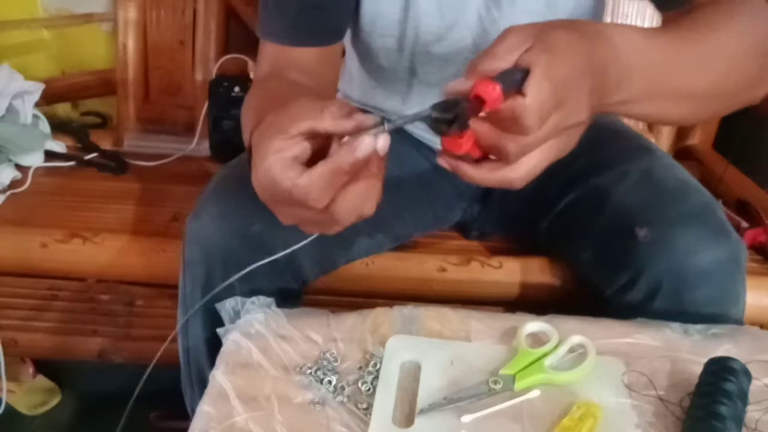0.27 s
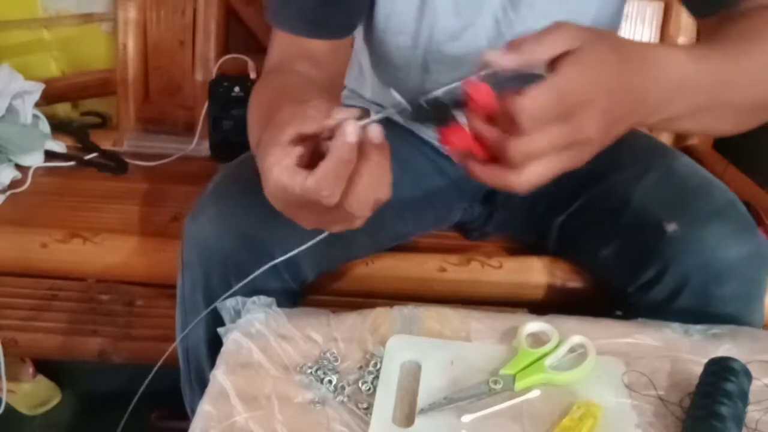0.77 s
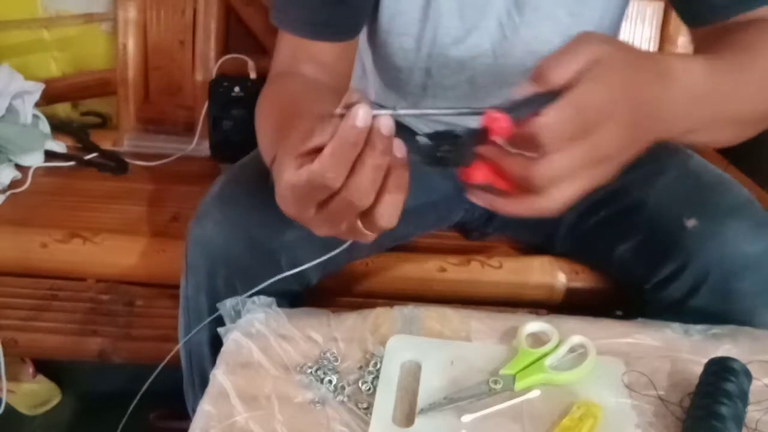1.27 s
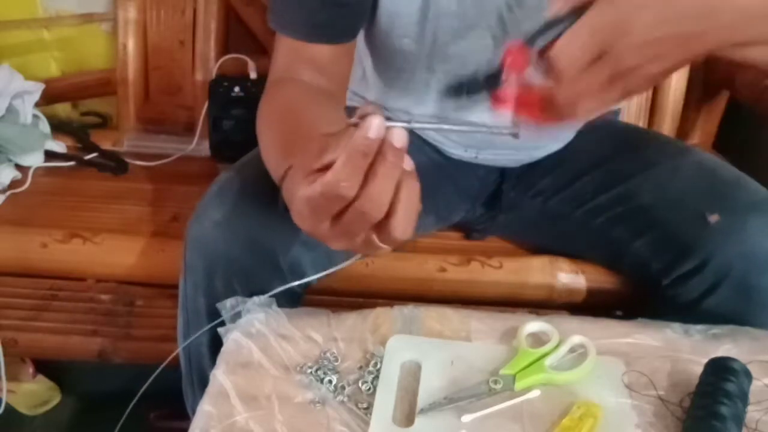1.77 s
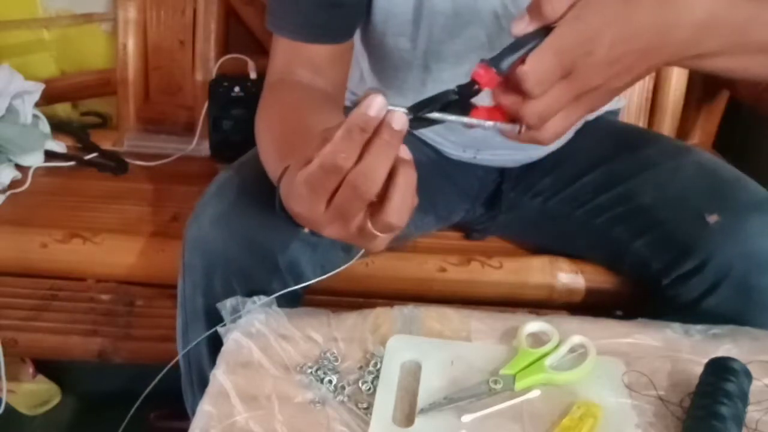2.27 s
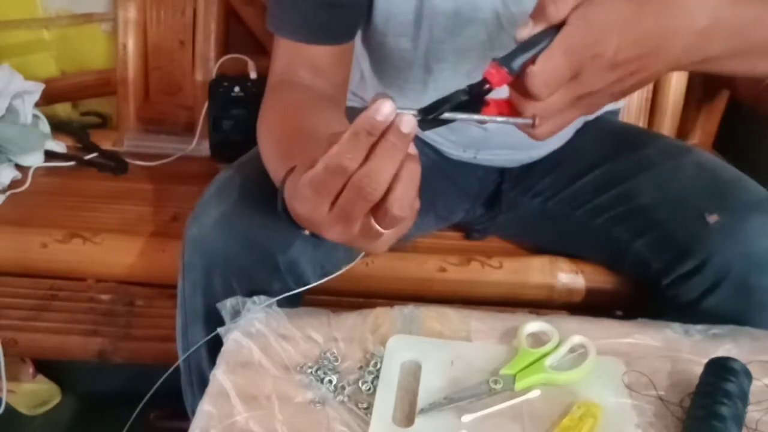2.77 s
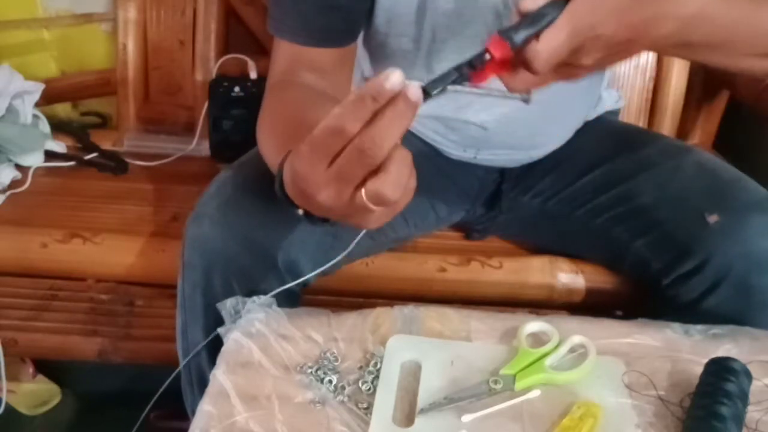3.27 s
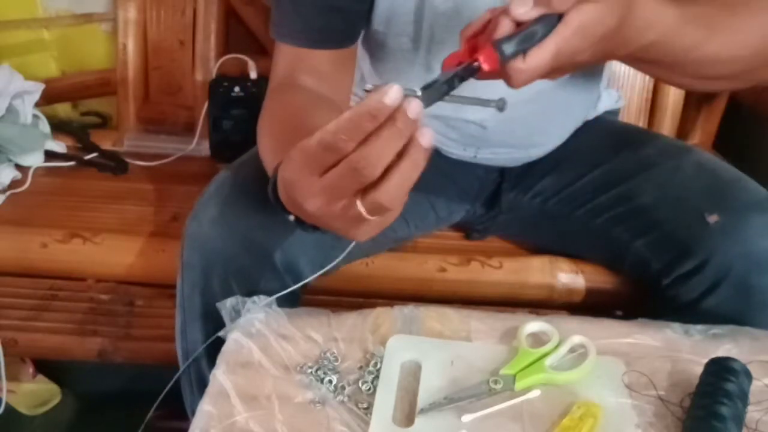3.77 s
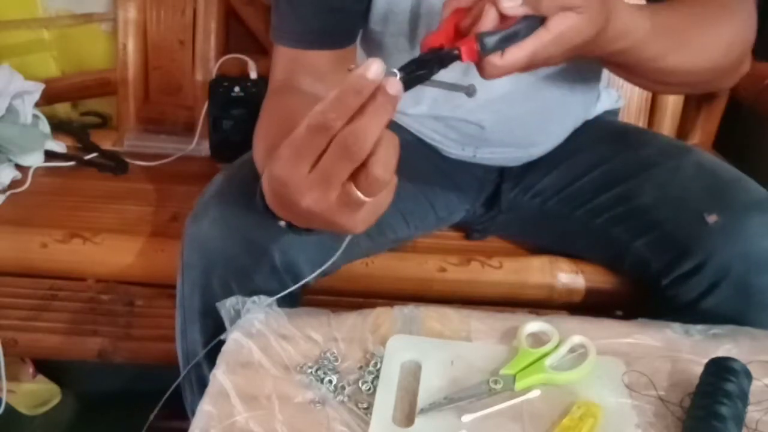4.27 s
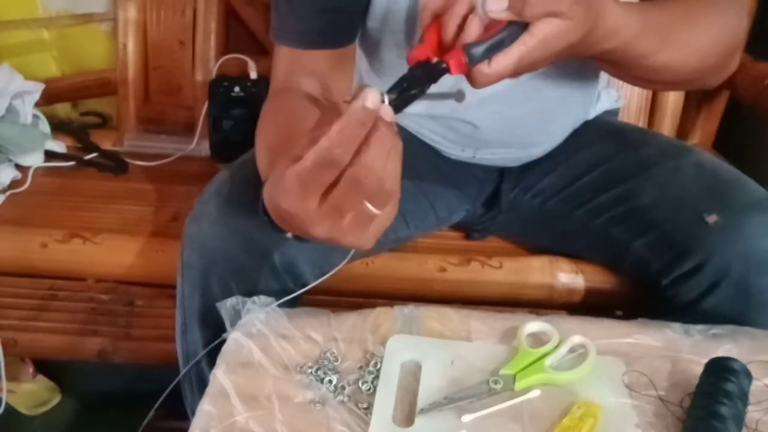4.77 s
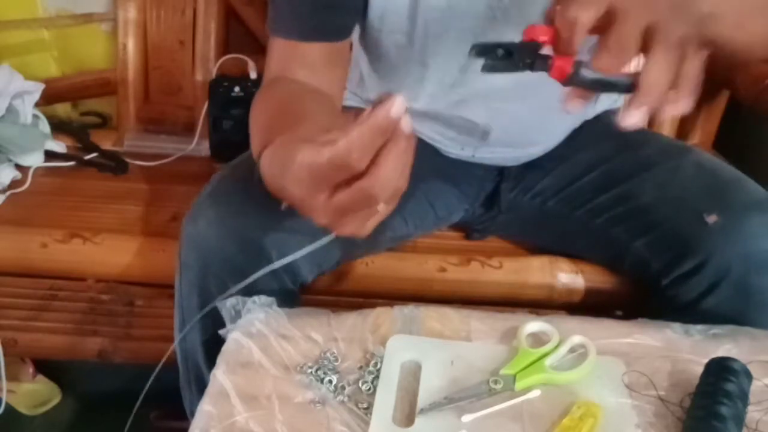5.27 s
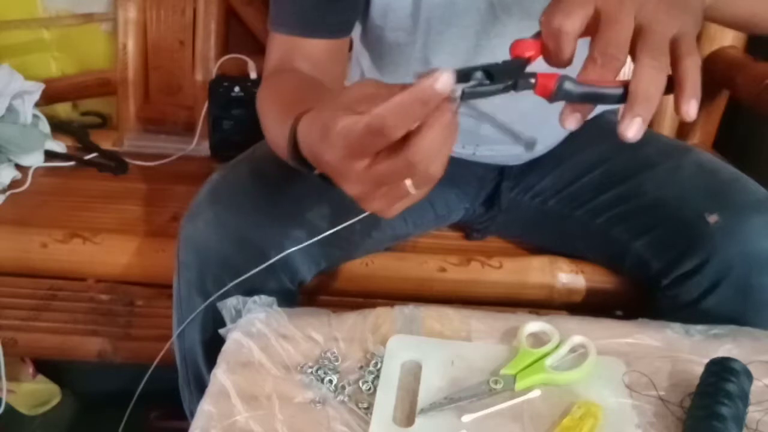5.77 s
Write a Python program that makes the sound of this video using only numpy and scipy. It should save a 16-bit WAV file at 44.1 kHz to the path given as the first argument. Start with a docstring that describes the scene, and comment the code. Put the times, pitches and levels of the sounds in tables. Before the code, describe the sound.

Distant hammer blows on wood, about two a second, sound behind close metallic plier clicks, tiny wire ticks and constant hiss.

```python
"""In a half-open wooden workroom, pliers work steel wire round a nail close to a small microphone.
Jaws snap, scrape and tick: short noise bursts, with ringing steel in the snaps and scrapes.
Further off a hammer hits wood, mostly about twice a second: ringing modes and noise echoes.
Something hollow is bumped once: a note, a low thud and echoes. Steady filtered noise hisses below."""
import sys
import numpy as np
from scipy import signal
from scipy.fft import rfft, irfft
from scipy.io import wavfile
from scipy.ndimage import uniform_filter1d

SR = 44100
rng = np.random.default_rng(int(sys.argv[2]) if len(sys.argv) > 2 else 0)


def output_pcm(signal):
    """Save a mono or channel-first signal as 16-bit PCM at the path in sys.argv[1].

    Samples are clipped to [-1, 1] before scaling.
    """
    pcm = np.clip(np.atleast_2d(signal).T, -1, 1) * 32767
    wavfile.write(sys.argv[1], SR, np.round(pcm).astype(np.int16))


N = 264644  # length of the scene in samples, about 6 s

# hammer blows: (time [s], strength [dB], brightness [dB per octave], extra sizzle [dB])
BLOWS = [(.351, -7.5, 0, -14), (1.29, -5, -0.4, -2.5), (1.826, -.3, 1.5, -9), (2.299, -4.5, 2.5, -14),
         (2.763, -1, 1.1, -13), (3.2272, -7, 0.5, 3), (3.6505, -5.5, -0.3, -10), (4.103, -4.5, 0.5, -8)]
# how slowly sound builds up, before each source stretches it: (pitch [Hz], build-up time [s])
SWELL = [(100, 0.0096), (400, 0.0045), (900, 0.00093), (1500, 0.0019), (5000, 0.012)]


def amp(db):
    """Turns decibels into a factor that multiplies the wave."""
    return 10 ** (np.asarray(db) / 20)


def read(points, hz):
    """Reads a table at any pitch, with straight lines between its points over log frequency."""
    f, value = np.transpose(points)
    return np.interp(np.log(hz + 1), np.log(f + 1), value)


def add(mix, s, sound):
    """Lays a sound into the mix at time s [s]; what runs past the end is cut off."""
    part = mix[round(s * SR):][:len(sound)]
    part += sound[:len(part)]


def colour(x, db_at, size=8192):
    """Filters with a gain of db_at(Hz) [dB]; each sound is answered only after it arrives."""
    log_gain = np.log(amp(db_at(abs(np.fft.fftfreq(size, 1 / SR)))))
    # the Hilbert transform finds the phase that puts the response as early as possible
    taps = np.fft.ifft(np.exp(np.conj(signal.hilbert(log_gain)))).real
    return signal.fftconvolve(x, taps[:size // 2])[:len(x)]


def within(x, low_hz, high_hz, order=8):
    """Keeps a range of pitches, with a steep lower edge and a gentler upper one."""
    low, high = np.minimum([low_hz, high_hz], SR / 2 - 1)
    high_pass = signal.butter(order, low, "high", fs=SR, output="sos")
    low_pass = signal.butter(order // 2, high, fs=SR, output="sos")
    return signal.sosfilt(low_pass, signal.sosfilt(high_pass, x))


def mode(hz, db, rise, t60):
    """One resonance builds up over rise [s] and dies away, falling 60 dB in t60 [s]."""
    t = np.arange(SR // 2) / SR
    envelope = (1 - np.exp(-t / rise)) * np.exp(-np.log(1000) * t / t60)
    return amp(db) * envelope * np.sin(2 * np.pi * (hz * t + rng.random()))


def echoes(swell=0.95, linger=1., bands=9):
    """Half a second of dense reflections, each band of noise building up and dying at its own pace."""
    # how long the room rings, before linger stretches it: (pitch [Hz], time to fall 60 dB [s])
    room_ring = [(100, 0.19), (500, 0.51), (1200, 0.33), (3500, 0.52), (8000, 0.15), (15000, 0.32)]
    t = np.arange(SR // 2) / SR
    spectrum = rfft(rng.standard_normal(len(t)))
    hz = np.fft.rfftfreq(len(t), 1 / SR)
    centres = np.geomspace(60, 15000, bands)
    out = np.zeros(len(t))
    # each row of shares picks one band, which fades into its neighbours
    for centre, share in zip(centres, np.eye(bands)):
        band = irfft(spectrum * read(np.c_[centres, share], hz), len(t))
        build_up = 1 - np.exp(-t / (swell * read(SWELL, centre)))
        decay = np.exp(-np.log(1000) * t / (linger * read(room_ring, centre)))
        out += band * build_up * decay
    return out


def burst(length, passes=6):
    """A dying noise crack of unit energy, its pitches evened out; length [s] sets how fast it fades."""
    t = np.arange(SR // 2) / SR
    fade = np.exp(-t / length)
    crack = rng.standard_normal(len(t)) * fade
    for _ in range(passes):
        # make all pitches equally strong, then fade a little again
        even = irfft(np.exp(1j * np.angle(rfft(crack))), len(t))
        crack = even * fade ** (1 / passes)
    return crack / np.linalg.norm(crack)


def scratch(length, wet_db=-0.5, swell=0.53, linger=0.84):
    """A burst of friction and its answer from the room."""
    room = echoes(swell, linger)
    return burst(length) + amp(wet_db) * room / np.linalg.norm(room)


def reflect(x, echo_db, latest=.006, count=6):
    """Nearby boards return short echoes, which leave fine fixed ripples in the spectrum."""
    echo = np.zeros(len(x))
    for k, u in enumerate(rng.random(count)):
        delay = int((.2 + .8 * u) * latest * SR)
        echo += np.roll(x, delay) * (-1) ** k  # every other echo is upside down
    return (x + amp(echo_db) * echo / np.sqrt(count)) / np.hypot(1, amp(echo_db))


def mottle(x, frames=5, bins=11):
    """Lets the level drift in small patches of time and pitch."""
    # typical drift of a patch, before overlapping frames blend: (pitch [Hz], drift [dB])
    drift_size = [(100, 1.5), (300, 2), (800, 4), (1250, 0.4), (2000, 2), (4000, 1.5), (9000, 1),
                  (13000, 3)]
    hz, _, z = signal.stft(x, SR, nperseg=1024, noverlap=768)
    patches = uniform_filter1d(rng.standard_normal(z.shape), bins, axis=0)
    patches = uniform_filter1d(patches, frames, axis=1)
    drift_db = read(drift_size, hz)[:, None] * patches / patches.std()
    return signal.istft(z * amp(drift_db), nperseg=1024, noverlap=768)[1][:len(x)]


def background():
    """Mottled hiss, made of noise, with the room's standing waves and two faint tones from afar."""
    # colour of the steady hiss: (pitch [Hz], level [dB])
    hiss = [(20, -66), (45, -45), (85, -34), (130, -35), (200, -37), (400, -43.5), (750, -42), (1000, -35),
            (2000, -35.5), (6000, -38), (16000, -41.5)]
    # standing waves that lift the hiss: (pitch [Hz], width [Hz], boost [dB])
    standing_waves = [(233, 12, 6.5), (290.3, 5, 9.5), (445, 32.5, 12.5), (523, 24, 8.5), (624.7, 16, 10),
                      (967, 24, 6.5), (1248, 55, 2.5)]
    # faint distant tones: (time [s], pitch [Hz], level [dB], length [s])
    far_tones = [(5.68, 520, -48, 0.14), (5.757, 1235, -48, 0.11)]

    def hiss_db(hz):
        peaks = sum(db / (1 + (2 * (hz - f) / width) ** 2) for f, width, db in standing_waves)
        return read(hiss, hz) + peaks

    air = colour(rng.standard_normal(N), hiss_db)
    air = mottle(reflect(air, echo_db=-11))
    for s, hz, db, length in far_tones:
        t = np.arange(int(length * SR)) / SR
        swell_and_fade = np.sin(np.pi * t / length)
        add(air, s, amp(db) * swell_and_fade * np.sin(2 * np.pi * hz * t))
    return air


def wire_ticks(count=70, loudest_db=-8, spread_db=4, centre_hz=7800, length=0.007):
    """Tiny noise ticks as the wire creeps between fingers and nail, each at its own pitch."""
    out = np.zeros(N)
    for when, softness, pitch in rng.random((count, 3)):
        hz = centre_hz * 2 ** (pitch - .5)  # up to half an octave either way
        tick = within(burst(length), hz / 1.1, hz * 1.1)
        add(out, when * N / SR, amp(loudest_db - spread_db * softness) * tick)
    return out


def hammer(ring_t60=0.32, dense_db=-1, linger=0.97, swell=1.8, lag=.002, fresh=0.82,
           spot_db=2.0, knock_hz=880, knock_db=-28):
    """A soft direct knock leads ringing wood and louder echoes, partly shared and partly new each time."""
    # the struck wood and the room round it, before the spot shifts them: (pitch [Hz], level [dB])
    wood_modes = [(168, -32), (234, -31), (281, -35.5), (414, -36), (458, -37), (623, -85), (763, -45),
                  (827, -29), (869, -34), (908, -43), (968, -47), (1047, -38), (1201, -42.5), (1236, -35.5),
                  (1296, -43), (1405, -40), (1518, -41), (1640, -39), (1785, -32.5)]
    # colour of the dense echoes, before dense_db and the blow's strength: (pitch [Hz], level [dB])
    blow_colour = [(40, -34), (100, -8), (220, -10), (400, -15), (850, -11.5), (1300, -15), (2100, -15.5),
                   (3200, -22.5), (4500, -28.5), (7000, -27), (15000, -40)]
    rings = np.array([mode(hz, db, swell * read(SWELL, hz), ring_t60) for hz, db in wood_modes])
    path = echoes(swell, linger)  # the part of the echoes that every blow shares
    out = np.zeros(N)
    for s, db, bright, _ in BLOWS:
        dense = np.sqrt(1 - fresh ** 2) * path + fresh * echoes(swell, linger)
        # the spot struck makes some modes stronger and others weaker
        ring = amp(spot_db * rng.standard_normal(len(wood_modes))) @ rings
        blow = ring + amp(dense_db) * colour(dense, lambda hz: read(blow_colour, hz))
        # brightness tilts the sound round 1000 Hz
        tilted = colour(blow, lambda hz: bright * np.log2(np.clip(hz, 150, 4000) / 1000))
        add(out, s, amp(db) * mode(knock_hz, knock_db, 0.00033, 0.12))
        add(out, s + lag, amp(db) * tilted)
    return out


def hammer_treble():
    """Noise bursts on each blow: an upper-middle crack, stronger when bright, and a thin sizzle."""
    crack_db, crack_db_per_brightness, crack_lag_s = -5, 4, 0.0064
    sizzle_base_db, sizzle_lag_s = 7, 0.0049  # both lags count from the knock
    out = np.zeros(N)
    for s, db, bright, sizzle_db in BLOWS:
        crack = within(scratch(.04), 1960, 4200, order=4)
        sizzle = within(scratch(0.039), 9000, 15000)
        add(out, s + crack_lag_s, amp(db + crack_db + crack_db_per_brightness * bright) * crack)
        add(out, s + sizzle_lag_s, amp(db + sizzle_base_db + sizzle_db) * sizzle)
    return out


def slip(length, low_hz, high_hz):
    """One slip of steel on steel rings the tool and then the room."""
    # pliers in the hand: (pitch [Hz], level before filtering [dB], time to fall 60 dB [s])
    steel = [(906, -48, 0.13), (1170, -40, 0.039), (3600, -30.5, 0.086), (4180, -28, 0.031),
             (5860, -45, 0.022), (6680, -32, 0.036)]
    ring = sum(mode(hz, level, 0.0009, t60) for hz, level, t60 in steel)
    return within(scratch(length) + ring, low_hz, high_hz)


def pliers():
    """Sudden slips of the jaws are wide snaps of noise and ringing; slow ones are narrow scrapes."""
    # jaws snap on wire and nail; a short free end rings only high:
    # (time [s], level before filtering [dB], lowest pitch [Hz])
    snaps = [(.6550, 7, 140), (1.8586, -1.5, 3000), (4.6988, 3, 5700), (5.756, -4, 6500), (5.8235, 0, 6650)]
    # wire slides through the jaws: (time [s], level before filtering [dB], pitch [Hz])
    scrapes = [(1.378, -7, 10400), (2.77, 1, 5660), (4.239, -4, 8400), (4.2603, -4.5, 15600),
               (4.96, -7, 9100), (5.105, -7, 7900), (5.834, -2, 16400)]
    # colour of snaps and scrapes: (pitch [Hz], gain [dB])
    click_colour = [(120, -40), (240, -5), (480, -13), (900, 4.5), (1400, -7.5), (2600, -0.5), (3500, 1),
                    (4900, 1), (5800, 2.5), (9000, 2), (15000, 11.5)]
    full_snap_s, halving_hz = 0.002, 3000  # the higher a snap starts, the sooner it dies
    hard_top_hz, hard_db, dull_octaves_per_db = 12600, 1.5, 0.36  # softer snaps are duller
    scrape_s, scrape_octaves = .013, 0.26  # decay time, and reach to either side of the pitch
    out = np.zeros(N)
    for s, db, low_hz in snaps:
        top_hz = hard_top_hz / 2 ** (dull_octaves_per_db * max(hard_db - db, 0))
        snap_s = full_snap_s / (1 + low_hz / halving_hz)
        add(out, s, amp(db) * slip(snap_s, low_hz, top_hz))
    for s, db, hz in scrapes:
        reach = 2 ** scrape_octaves
        add(out, s, amp(db) * slip(scrape_s, hz / reach, hz * reach))
    return colour(out, lambda hz: read(click_colour, hz))


def bump(note_rise=0.0022, thud_rise=0.0086, echo_lag=.02, swell=0.33, linger=2.54):
    """A touch rings a hollow note, echoes follow, and a low thud sounds as the weight settles."""
    # modes rung by the touch: (pitch [Hz], level [dB])
    note_modes = [(410, -30), (587, -46)]
    # modes rung as the weight settles: (pitch [Hz], level [dB])
    thud_modes = [(73.6, -34), (109, -46), (178, -32.5), (233, -36.5)]
    # colour of the bump's echoes: (pitch [Hz], gain [dB])
    bump_colour = [(25, -25), (60, -15), (150, -13), (280, -24), (600, -25.5), (1000, -48), (4000, -66)]
    touch_s, settle_s, t60 = 3.442, .034, 0.38  # first touch, wait until it settles, ring [s]
    out = np.zeros(N)
    add(out, touch_s, sum(mode(hz, db, note_rise, t60) for hz, db in note_modes))
    add(out, touch_s + settle_s, sum(mode(hz, db, thud_rise, t60) for hz, db in thud_modes))
    room = colour(echoes(swell, linger), lambda hz: read(bump_colour, hz))
    add(out, touch_s + echo_lag, room)
    return out


def scene():
    """All sources reach one microphone; both channels carry the same sound."""
    work = wire_ticks() + pliers()
    knocks = hammer() + hammer_treble() + bump()
    return np.tile(background() + work + knocks, (2, 1))


def record(dry):
    """The microphone in its case colours the sound, then a low-pass filter removes the top."""
    # response of the microphone in its case: (pitch [Hz], gain [dB])
    mic = [(900, -0.5), (1100, 1), (1250, 8.5), (1400, 4), (1700, -2.5), (5000, -2.5), (6150, 1.5),
           (6600, -6), (7000, 1), (7450, -0.5), (8100, -10), (10000, -20.5), (13700, -33), (15100, -14)]
    edge_hz = 15500
    heard = np.array([colour(side, lambda hz: read(mic, hz)) for side in dry])
    low_pass = signal.firwin(511, edge_hz, window=("kaiser", 9), fs=SR)
    return signal.oaconvolve(heard, low_pass[None], "same", axes=1)


dry = scene()
out = record(dry)
output_pcm(out)
```